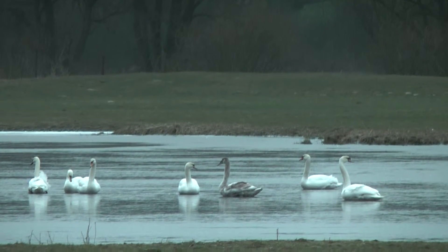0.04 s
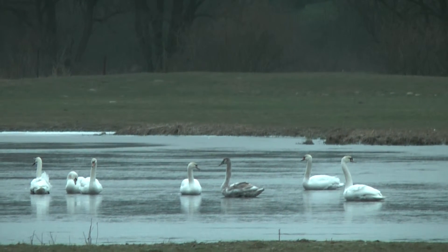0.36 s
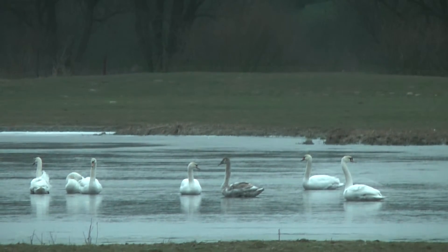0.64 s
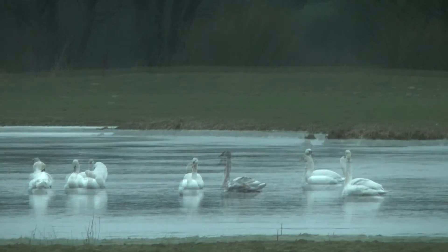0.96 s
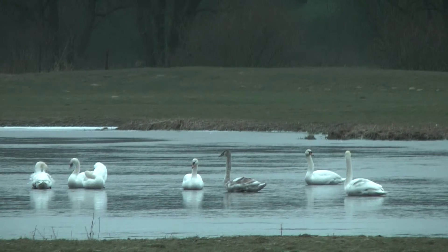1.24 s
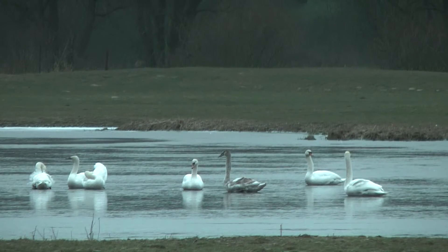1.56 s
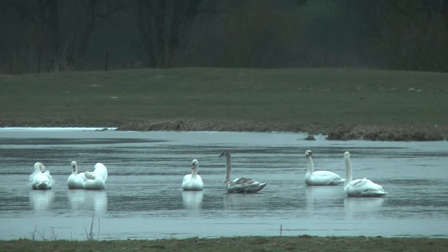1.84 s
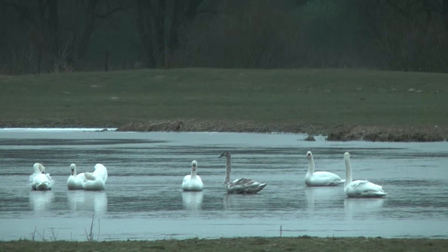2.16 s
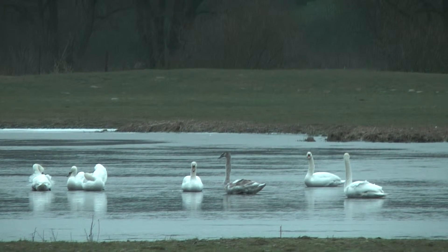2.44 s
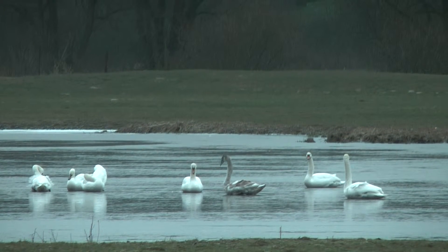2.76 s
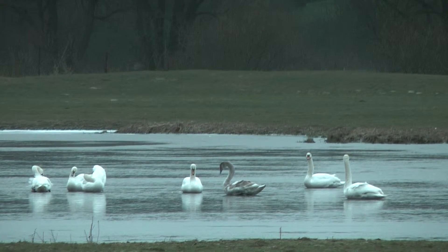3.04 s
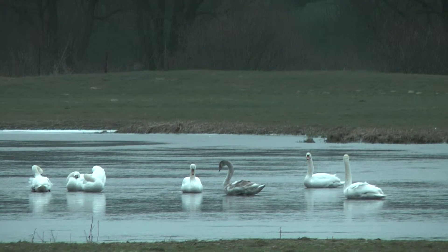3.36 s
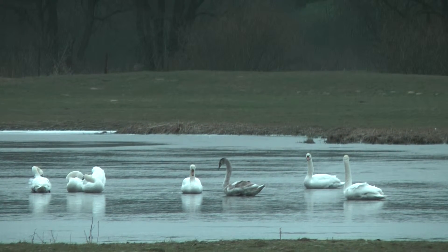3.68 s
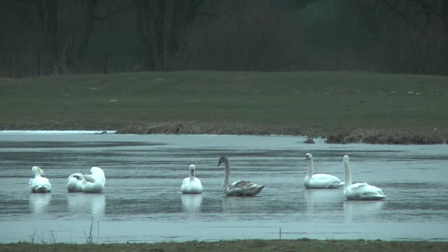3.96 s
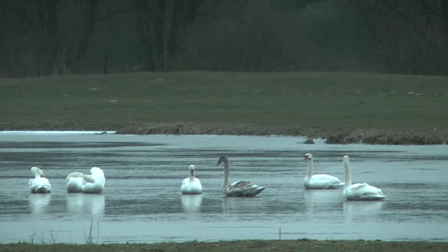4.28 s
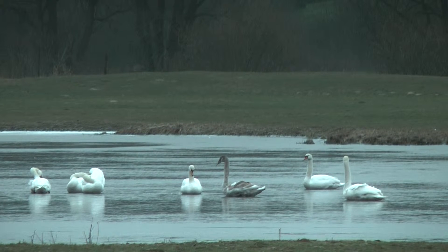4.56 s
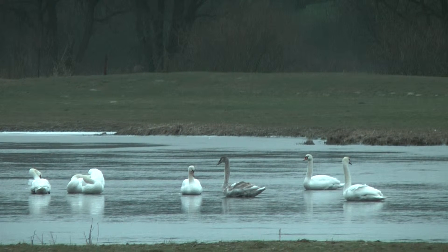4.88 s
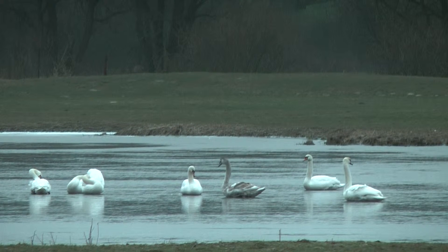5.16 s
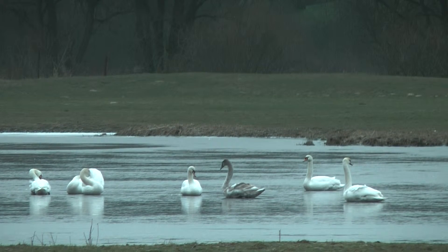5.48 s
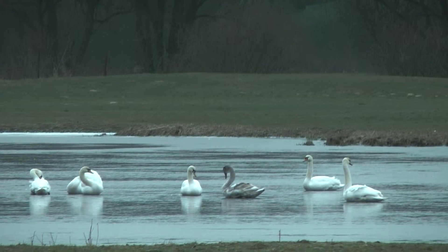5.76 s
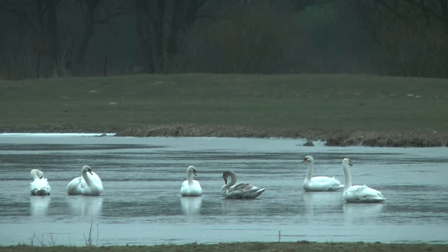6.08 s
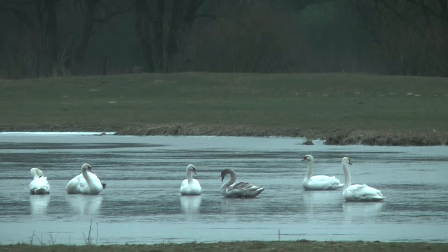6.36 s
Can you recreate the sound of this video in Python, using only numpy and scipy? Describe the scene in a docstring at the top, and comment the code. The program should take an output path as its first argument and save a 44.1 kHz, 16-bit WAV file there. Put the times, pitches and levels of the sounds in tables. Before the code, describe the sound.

Strong wind opens with a centred low rumble, a rough roar and a hiss of dry grass. By about 1.2 seconds it has faded into quieter, wider wind that buffets the microphone in irregular low puffs, stronger near 2.6 and 4.5 seconds. Distant trees rush softly and dry stalks tick faintly. A small bird gives one barely audible high trill at 1.6 seconds. Swans on the pond, slightly to the right, give six short, soft toots at about 2.5, 3.5, 4.4, 5.3, 6.0 and 6.5 seconds. Each lasts around a tenth of a second or less, is fairly high, sags slightly in pitch and leaves a light echo from the banks. The fourth is the longest and a little raspy. From 6.2 seconds the loudest gust thumps and rumbles against the microphone, nearly covering the final toot.

```python
"""First strong wind roars, the same in both ears, then cross-fades over about a second into quieter,
wider wind that buffets the microphone. Far trees rush, dry grass hisses and ticks, and a small bird
trills once, very faintly. Swans give six short, falling toots across a winter pond, and the banks and
trees scatter them back. The wind is shaped noise; each toot is a tone shaped by the swan's throat."""
import sys
import numpy as np
from scipy import signal
from scipy.fft import rfft, irfft
from scipy.io import wavfile
from scipy.ndimage import uniform_filter1d

SR = 44100
rng = np.random.default_rng(int(sys.argv[2]) if len(sys.argv) > 2 else 0)


def transcribe(u):
    """Save the signal u as a 16-bit wav file named by the first command-line argument.

    u: samples, shape (n,) or (channels, n), limited to [-1, 1]; the rate is SR.
    q: integer samples, one column per channel.
    """
    v = np.clip(np.atleast_2d(u).T, -1, 1)
    q = np.round(v * 32767).astype(np.int16)
    wavfile.write(sys.argv[1], SR, q)


N = 287532
TIME = np.arange(N) / SR
FREQ = np.arange(N // 2 + 1) * SR / N

# How the wind sounds rise and fall. Each row: time in seconds, relative level in dB.
TREE_LEVELS = [(1.3, -55.5), (1.54, -56.5), (2.06, -57.5), (4.18, -54), (4.52, -51), (4.82, -54.5),
               (6.2, -52.5)]
GRASS_LEVELS = [(0.0, -45), (0.05, -47), (0.49, -41.5), (0.83, -49), (1.3, -63.5), (4.51, -60),
                (4.6, -57.5), (5.03, -59.5), (5.65, -56), (5.83, -51), (6.41, -51), (6.5, -50.5)]
DRAUGHT_LEVELS = [(1.2, -40), (2.2, -52.5), (6.5, -51)]  # the light air between puffs
# The strong opening wind. Each row: time in seconds, relative rumble and roar levels in dB.
OPENING_LEVELS = [(0.0, -20, -36), (0.032, -17, -27), (0.092, -22, -28), (0.152, -18, -25.5),
                  (0.232, -25.5, -30.5), (0.394, -23, -32), (0.448, -32, -33.5), (0.704, -28.5, -35),
                  (0.884, -26, -37), (0.982, -40, -49), (1.014, -30.5, -37), (1.1, -37, -42),
                  (1.15, -35, -44.5)]
# Puffs of wind on the microphone. Each row: start and length in seconds, level in dB, lean left in dB.
WIND_PUFFS = [(1.41, 0.16, -38, -3.5), (1.623, 0.19, -40, -2), (1.79, 0.29, -36.5, -1.5),
              (1.995, .22, -34, -1.5), (2.286, 0.16, -39.5, 2), (2.433, 0.17, -34, 1),
              (2.58, 0.08, -25, -2), (2.638, .13, -32.5, -1.5), (3.242, 0.38, -35, -2),
              (3.616, 0.27, -43.5, -3), (3.901, 0.29, -36, -1), (4.085, 0.25, -42.5, -1.5),
              (4.299, 0.63, -36, 0.5), (4.447, 0.097, -28, -1), (4.583, 0.12, -25.5, -2),
              (5.243, 0.073, -42, -7), (5.592, .12, -41, -3), (5.842, 0.14, -38, 3),
              (6.18, 0.56, -23.5, -1), (6.307, 0.16, -13, 0.5)]
# Dry stalks ticking. Each row: start and fade time in seconds, centre frequency in Hz, level in dB.
STALK_TICKS = [(1.316, 0.013, 8500, -61), (2.040, 0.056, 13500, -61), (3.201, 0.014, 5300, -54.5),
               (3.863, .008, 12500, -59), (3.942, 0.0074, 6000, -58), (4.287, .012, 4400, -58),
               (4.703, .008, 9500, -57)]

# A colour says how strong the lows and highs are. Each row: frequency in Hz, relative level in dB.
LEAF_COLOUR = [(20, -25), (70, -17), (140, 2.5), (250, 3.5), (400, 0.5), (600, -0.5), (780, -3.5),
               (1000, -3), (1350, -8), (1750, -7.5), (2250, -12), (2800, -20.5), (4500, -36), (9000, -75)]
HISS_COLOUR = [(1000, -11), (2200, 2), (3200, -0.5), (4300, 1), (5400, -0.5), (6500, -3), (7300, -7.5),
               (8700, -7), (9500, -4.5), (11500, -8), (14000, -6.5), (16000, -8.5)]
PUFF_COLOUR = [(15, -50), (30, -3.5), (58, 1), (85, 1.5), (120, -0.5), (170, -7), (240, -11.5), (330, -18),
               (500, -23.5), (800, -37.5), (1500, -54), (4000, -111)]
WIND_RUMBLE_COLOUR = [(15, -24), (30, -1), (45, -12), (68, 2.5), (105, -9.5), (150, -8), (195, -5.5),
                      (280, -12.5), (420, -23), (900, -66)]
WIND_ROAR_COLOUR = [(150, -25), (300, 3), (420, 2.5), (540, 2), (750, -2), (1100, -4.5), (1250, -6.5),
                    (1480, -6), (1750, -10.5), (2150, -11.5), (2700, -18), (4000, -18.5), (7000, -32.5),
                    (15000, -72)]
BANK_COLOUR = [(900, -3), (1850, 6), (2800, 1.5), (3800, 6), (6000, -1)]  # makes the echoes brighter than the toots
THROAT_COLOUR = [(900, -1.5), (1850, -9), (2800, -12), (3750, -8.5), (4700, -21), (6500, -14)]

# Echoes from the water's edge and the banks. Each row: delay in seconds, relative level in dB.
BANK_ECHOES = [(0.024, -11), (0.049, -18), (0.076, -20), (.112, -16), (0.188, -24)]
# The swans' toots. Each row: start and length in seconds, first pitch and the pitch it sinks toward
# in Hz, fall time in seconds, relative level in dB, dB lost per overtone at mid-toot, rasp (0 is none).
TOOTS = [(2.474, 0.075, 944, 927, 0.044, -42, 9, 0), (3.543, 0.098, 958, 917.5, 0.025, -37, 7, 0),
         (4.351, 0.093, 942, 912, 0.03, -36.5, 8, 0), (5.327, 0.13, 957, 895, 0.0343, -35.5, 5, .045),
         (6.005, .056, 905, 880, 0.022, -36.5, 8, 0), (6.483, 0.039, 892, 880, .02, -36.5, 8, 0.07)]


def undb(db):
    """Turn decibels (dB) into a number to multiply a sound by."""
    return 10 ** (np.asarray(db) / 20)


def curve(rows, column=1):
    """Join one column of a table with straight lines over time."""
    rows = np.array(rows)
    return np.interp(TIME, rows[:, 0], rows[:, column])


def colour(points, hz):
    """Look up how strongly a colour lets each frequency through."""
    point_hz, db = np.transpose(points)
    return undb(np.interp(np.log(hz + 1), np.log(point_hz), db))


def tint(sound, points):
    """Give a sound a colour by turning its frequencies up or down."""
    return irfft(rfft(sound) * colour(points, FREQ), N)


def noise(points, band_hz):
    """Coloured noise, scaled to a power of 1 inside the given band."""
    in_band = (FREQ > band_hz[0]) & (FREQ < band_hz[1])
    power = np.sum(colour(points, FREQ)[in_band] ** 2) / len(FREQ)
    return tint(rng.standard_normal(N), points) / np.sqrt(power)


def wobble(per_second):
    """A smooth random wander around zero, typically about 1 in size."""
    hold = max(int(SR / per_second), 2)
    steps = np.repeat(rng.standard_normal(N)[:N // hold + 1], hold)
    smooth = uniform_filter1d(uniform_filter1d(steps, hold), hold)[:N]
    return smooth / smooth.std()


def stereo(mid, side, pan_db):
    """Make left and right: mid is shared, side adds width, and a positive pan_db leans left."""
    return np.array([(mid + side) * undb(pan_db / 2), (mid - side) * undb(-pan_db / 2)])


def far_trees(side_db=-7, flicker_db=0.65, gain_db=-1.5):
    """Wind in distant trees makes a soft, dull rush, faded in as the opening wind is faded out."""
    mid, side = (noise(LEAF_COLOUR, (1100, 1700)) for _ in range(2))
    fade_in = np.interp(TIME, [.6, 1.2], [0, 1])
    strength = undb(curve(TREE_LEVELS) + gain_db + flicker_db * wobble(6.9)) * fade_in
    return stereo(mid, undb(side_db) * side, pan_db=1.0) * strength


def grass(flicker_db=.5, gain_db=-0.97, pan_db=1.5):
    """Wind makes the grass hiss; a high, airy part is always wide, the rest widens in the cross-fade."""
    mid, side, air = (noise(HISS_COLOUR, (4200, 15000)) for _ in range(3))
    side = tint(side, [(3000, -14.0), (6000, -9.5), (8500, -2), (9800, -41)])
    air = tint(air, [(3800, -60), (5500, -15), (7500, -3), (9000, -5), (10000, -49), (15000, -27)])
    width = np.interp(TIME, [.8, 1.2], [0, 1])
    strength = undb(curve(GRASS_LEVELS) + gain_db + flicker_db * wobble(30))
    return stereo(mid, width * side + air, width * pan_db) * strength


def rustle(per_second=14, decay_s=0.0048, size_db=3.5, db=-69):
    """Many small stalks tick at random, barely above the hiss."""
    hits = rng.random(N) < per_second / SR
    sizes = undb(size_db * np.minimum(rng.exponential(size=N), 3))
    fades = signal.lfilter([1], [1, -np.exp(-1 / (decay_s * SR))], hits * sizes)
    treble = noise([(2000, -20), (5000, -8), (11000, 16), (15000, -3)], (4200, 15000))
    return undb(db) * fades * treble


def stalks(band_width=0.26):
    """Larger dry stems tick, each with a brief, faint burst of high noise."""
    out = np.zeros(N)
    for start, fade_s, hz, db in STALK_TICKS:
        band = np.exp(-(np.log((FREQ + 1) / hz) / band_width) ** 2)
        burst = irfft(rfft(rng.standard_normal(N)) * band, N)
        age = np.maximum(TIME - start, 0) / fade_s
        out += undb(db) * burst / burst.std() * np.minimum(10 * age, 1) * np.exp(-age ** 2)
    return out


def small_bird(hz=7300, start_s=1.57, length_s=0.13, trill_hz=24, db=-70):
    """A far-off bird trills: a thin whistle whose pitch swings quickly and blurs."""
    pitch = hz + 130 * np.sin(2 * np.pi * trill_hz * TIME) + 90 * wobble(700)
    age = np.clip((TIME - start_s) / length_s, 0, 1)
    swell = np.sqrt(np.abs(np.sin(np.pi * age)))
    return undb(db) * swell * np.sin(2 * np.pi * np.cumsum(pitch) / SR)


def eddies(points, span_s):
    """Swirling air rumbles; its level is evened out over span_s so the wind alone sets its strength."""
    rumble = noise(points, (25, 300))
    size = max(int(span_s * SR), 2)
    local_power = uniform_filter1d(uniform_filter1d(rumble ** 2, size), size)
    return rumble / np.sqrt(local_power)


def buffeting(rise_s=0.038, fall_s=0.088, flutter_db=2.0, side_db=1.0, roar_db=-45, roar_growth=1.02):
    """Swirls hit the microphone's two openings separately, in fluttering puffs over a light draught."""
    mid, side = (eddies(PUFF_COLOUR, span_s=.04) for _ in range(2))
    side = tint(side, [(30, -17), (70, -1), (200, 2), (450, 0), (1500, 10.5)])
    power = stereo(undb(curve(DRAUGHT_LEVELS)), 0, pan_db=-1.0) ** 2
    for start, length, db, pan_db in WIND_PUFFS:
        push = np.clip(np.minimum((TIME - start) / rise_s, (start + length - TIME) / fall_s), 0, 1)
        power += stereo(push * undb(db), 0, pan_db) ** 2
    fade_in = np.interp(TIME, [.6, 1.2], [0, 1])
    strength = np.sqrt(power) * undb(flutter_db * wobble(45)) * fade_in
    # Harder puffs also roar; the roar reaches roar_db when the strength is -20 dB.
    roar = np.array([noise(WIND_ROAR_COLOUR, (400, 2000)) for _ in range(2)])
    roar = roar * undb(roar_db) * (strength / undb(-20)) ** roar_growth
    return stereo(mid, undb(side_db) * side, 0) * strength + roar


def opening_wind(flicker_db=1.2, roar_gain_db=-0.53):
    """Strong wind rumbles with a rough roar on top, the same in both ears, and is faded out."""
    rumble = eddies(WIND_RUMBLE_COLOUR, span_s=0.073) * undb(curve(OPENING_LEVELS, column=1))
    roar = noise(WIND_ROAR_COLOUR, (400, 2000))
    roar *= undb(curve(OPENING_LEVELS, column=2) + flicker_db * wobble(68.4) + roar_gain_db)
    fade_out = np.interp(TIME, [1.1, 1.23], [1, 0])
    return (rumble + roar) * fade_out


def banks(sound, tail_s=0.91, tail_db=-13, build_s=0.048, side_db=-7, smear_s=0.00057):
    """The banks send back a few slightly smeared echoes; the trees add a soft, fading tail."""
    t = TIME[:SR]
    power = undb(-120 * t / tail_s) * np.minimum(t / build_s, 1) ** 2  # fades 60 dB in tail_s
    power *= undb(tail_db) ** 2 / power.sum()
    for delay, db in BANK_ECHOES:
        bump = np.exp(-((t - delay) / smear_s) ** 2)
        power += undb(db) ** 2 * bump / bump.sum()
    brighten = colour(BANK_COLOUR, np.fft.rfftfreq(SR, 1 / SR))
    echo_patterns = np.sqrt(power) * irfft(rfft(rng.standard_normal((2, SR))) * brighten, SR)
    mid, side = (signal.fftconvolve(sound, pattern)[:N] for pattern in echo_patterns)
    return stereo(mid, undb(side_db) * side, pan_db=-0.29)


def swans(attack_s=0.0063, release_s=0.037, jitter=0.0032, shimmer_db=-2.0, mellow_db=7.0, harmonics=6):
    """Each toot is a tone with overtones that starts high and bright, then sags in pitch and mellows."""
    out = np.zeros(N)
    waver, grit, flutter = wobble(130), wobble(900), wobble(160)
    for start, length, high_hz, low_hz, fall_s, db, tilt_db, rasp in TOOTS:
        on = (TIME >= start) & (TIME < start + length)
        t = TIME[on] - start
        age = t / length
        hz = low_hz + (high_hz - low_hz) * np.exp(-(t / fall_s) ** 2)
        # Uneven vibration smears the overtones, more so late in a raspy toot.
        hz *= 1 + jitter * waver[on] + rasp * np.sqrt(age) * grit[on]
        phase = 2 * np.pi * np.cumsum(hz) / SR
        breath = np.minimum(t / attack_s, 1) * np.minimum((length - t) / release_s, 1)
        loss_db = tilt_db + mellow_db * (age - .5)  # overtones weaken as the breath pressure drops
        tone = sum(colour(THROAT_COLOUR, k * hz) * undb(-loss_db * (k - 1)) * np.sin(k * phase)
                   for k in range(1, harmonics + 1))
        out[on] += np.sqrt(2) * breath * undb(db + shimmer_db * flutter[on]) * tone
    return out


def scene():
    """The swans call a little to the right, with their echoes and the wind all around."""
    toots = swans()
    wind = opening_wind() + buffeting() + far_trees() + grass()
    return stereo(toots, 0, pan_db=-5.5) + banks(toots) + wind + stalks() + small_bird() + rustle()


def record(dry, ceiling=.75, top_hz=15500):
    """The microphone rounds off the hardest buffets, and a steep filter cuts the highest treble."""
    rounded = dry / (1 + (dry / ceiling) ** 4) ** .25
    return signal.sosfilt(signal.ellip(10, .1, 80, top_hz, fs=SR, output="sos"), rounded)


dry = scene()
out = record(dry)
transcribe(out)
```